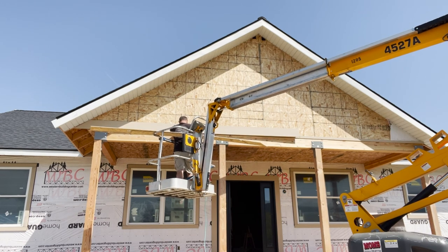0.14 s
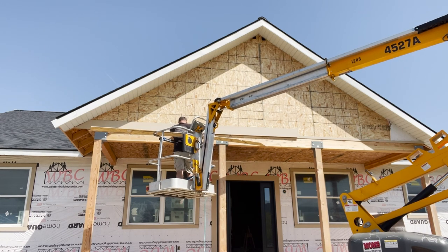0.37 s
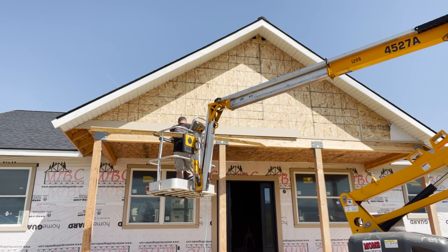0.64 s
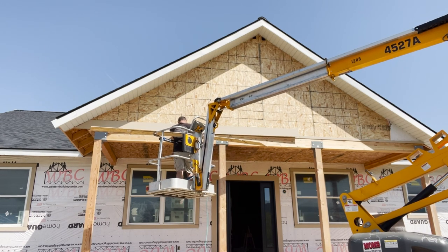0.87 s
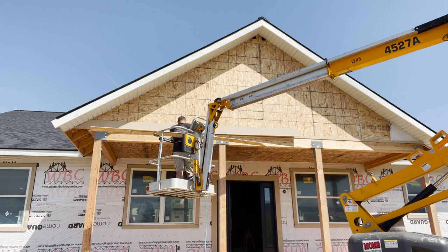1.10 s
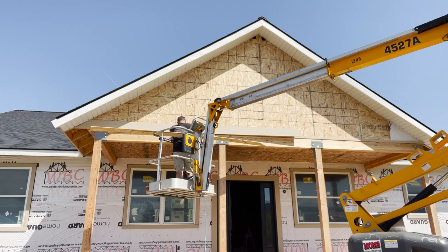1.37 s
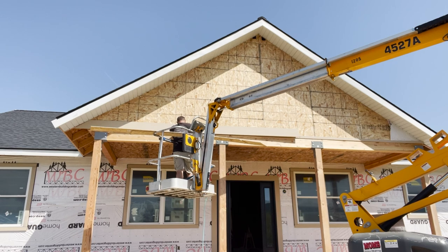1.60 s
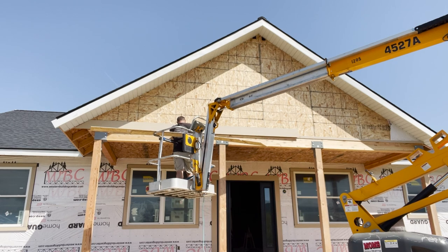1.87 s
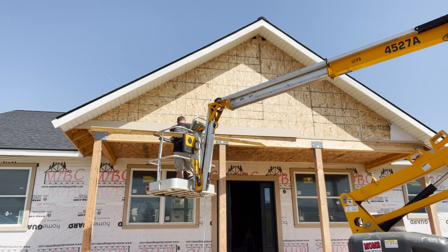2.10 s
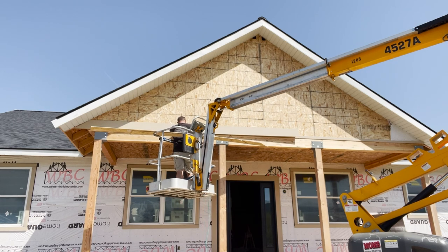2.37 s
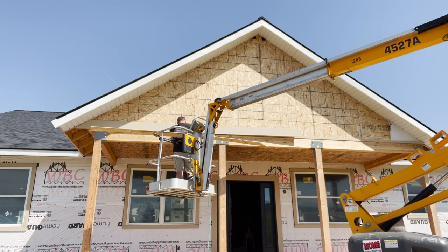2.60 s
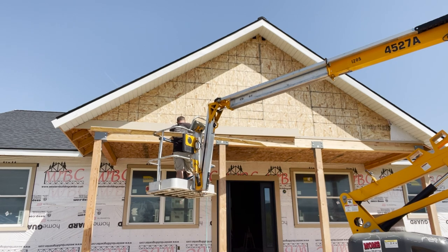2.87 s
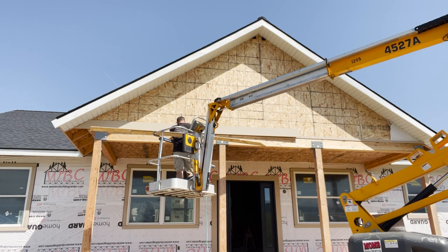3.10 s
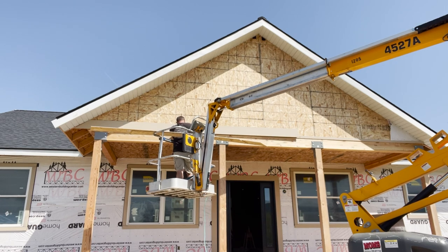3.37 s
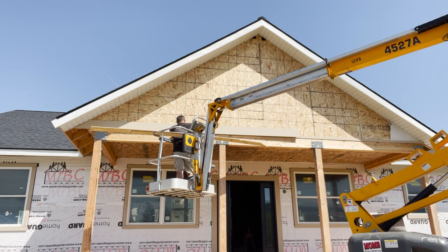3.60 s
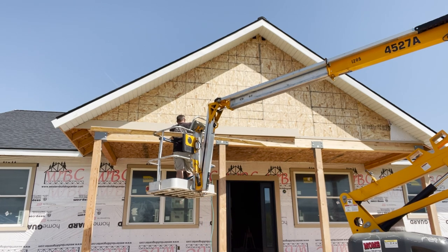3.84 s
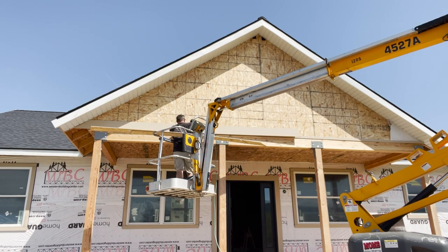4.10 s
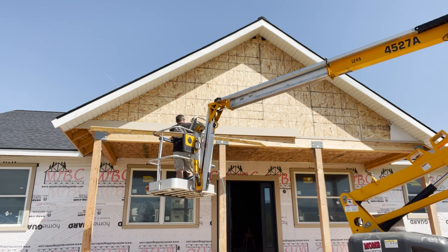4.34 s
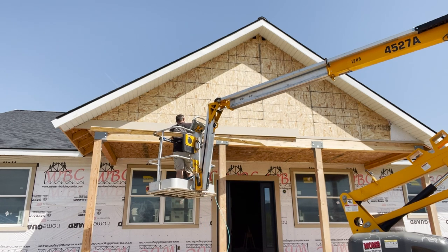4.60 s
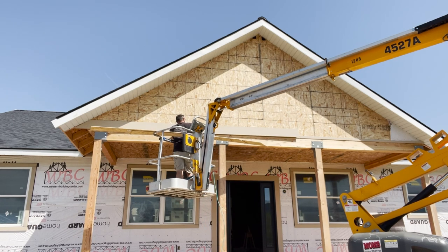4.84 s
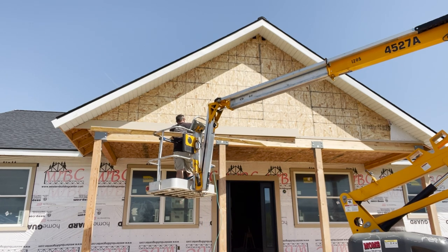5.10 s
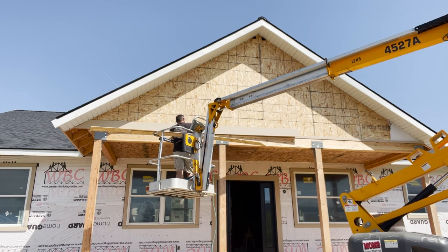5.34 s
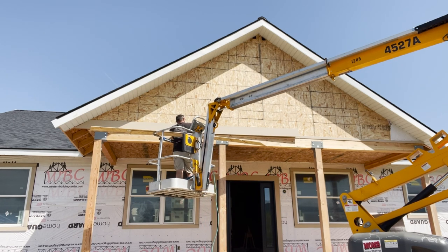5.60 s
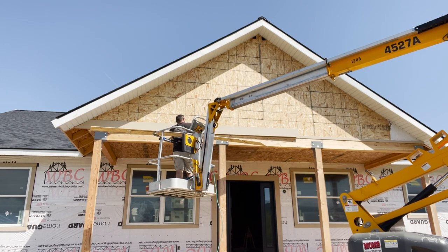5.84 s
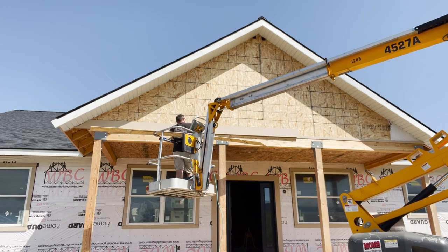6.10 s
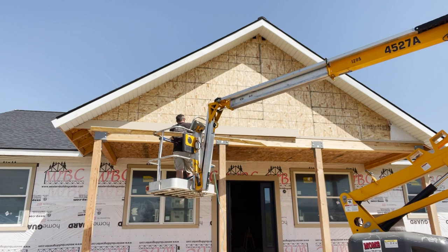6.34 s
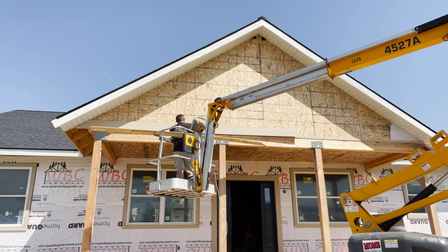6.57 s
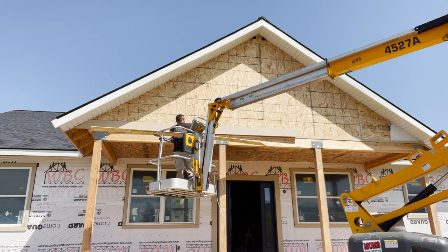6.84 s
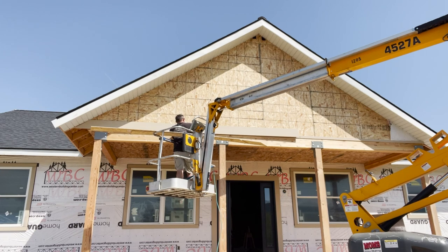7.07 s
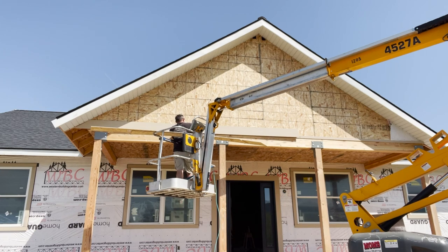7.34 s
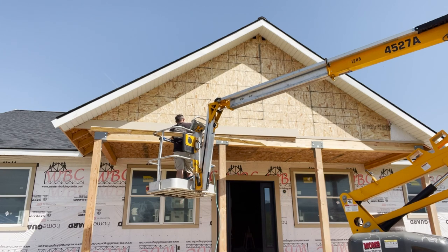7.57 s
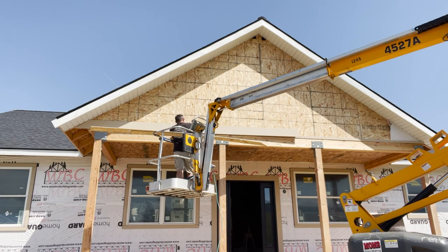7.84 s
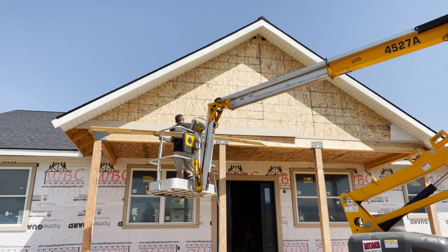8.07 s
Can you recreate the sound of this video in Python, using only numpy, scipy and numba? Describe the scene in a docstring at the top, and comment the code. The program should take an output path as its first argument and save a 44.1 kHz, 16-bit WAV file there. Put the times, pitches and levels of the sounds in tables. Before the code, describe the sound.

Throughout about 8 seconds, an engine drones to the right at roughly thirty firings a second, with a throbbing, rattling clatter and faint bright valve ticking. Wind thumps low on the stereo microphones, busiest in the first 1.7 seconds and again around 4, with scattered buffets later. A faint scrape comes at 0.5, then a tight group of woody knocks ahead at 1.5, with weaker taps at 1.7 and 2.0. From 3.15 to 3.5 a board bumps, scrapes and thuds, loudest near 3.36. Soft taps follow at 4.5 and 5.0. At 5.97 an air nailer fires once, a heavy, near-overloading crack, followed by two short gushes of hissing air, smaller thumps and metallic clicks until about 6.35. Porch posts scatter the blow immediately; the yard answers with a decaying tail and a faint late return. Engine and light wind continue to the end.

```python
"""A building site out of doors, ahead a timber porch: an engine drones to the right, gusts buffet two ports.
Engine: harmonics of the firing rate plus a throbbing noise clatter. Wind: swept noise in thumps and flaps.
A board is knocked into place: rough noise pushes ring its modes, slap and scrape.
Then an air nailer fires once: a heavy blow, bursts of hissing air, and small ringing metal ticks.
Posts, porch and yard return the work as early scatter and long decaying noise."""
import sys
import numpy as np
from scipy import signal
from scipy.fft import rfft, irfft, next_fast_len
from scipy.io import wavfile
from scipy.ndimage import uniform_filter1d, map_coordinates
from numba import njit

SR = 44100
rng = np.random.default_rng(int(sys.argv[2]) if len(sys.argv) > 2 else 0)


def voltage_ratio(decibels):
    """Convert decibels (scalar or array-like) to amplitude ratios, 20 dB per decade."""
    exponent = np.asarray(decibels, float) / 20
    return 10 ** exponent


def dump(signal):
    """Clip the signal to [-1, 1] and save it as 16-bit WAV at the path in sys.argv[1]."""
    limited = np.clip(np.atleast_2d(signal).T, -1, 1)
    pcm = np.round(limited * 32767).astype(np.int16)
    wavfile.write(sys.argv[1], SR, pcm)


N = 361617
T = np.arange(N) / SR
HZ = np.fft.rfftfreq(next_fast_len(N), 1 / SR)


def on_hz(table):
    """Spread a (pitch_hz, value) table over every bin, straight on a log axis."""
    hz, value = np.transpose(table)
    return np.interp(np.log(HZ + 1), np.log(hz + 1), value)


def ahead(table):
    """Phase turn of every bin from a (pitch_hz, phase_rad) table."""
    return np.exp(1j * np.interp(HZ, *np.transpose(table)))


def shape(x, gain):
    """Weight every frequency of x."""
    size = next_fast_len(N)
    return irfft(rfft(x, size) * gain, size)[..., :N]


def color_noise(x, table):
    """Give white noise the power per Hz of a (pitch_hz, level_db) table."""
    return shape(x, voltage_ratio(on_hz(table)) * np.sqrt(SR / 2))


def hiss(table):
    """Fresh noise coloured by a (pitch_hz, level_db) table."""
    return color_noise(rng.standard_normal(N), table)


def walk(rate_hz):
    """Random levels joined smoothly, so many a second; spread near 1."""
    step = int(SR / rate_hz)
    points = rng.standard_normal(N // step + 2)
    line = np.interp(np.arange(N) / step, np.arange(N // step + 2), points)
    return 1.22 * uniform_filter1d(line, step // 2 + 1)


def even(x, seconds):
    """Level out the swells of x over that span, rms near 1."""
    return x / np.sqrt(uniform_filter1d(x ** 2, int(seconds * SR)) + 0.23 * np.mean(x ** 2))


def decay(t, t60):
    """Exponential fall of 60 dB in t60, in the unit of t."""
    return np.exp(-np.log(1000) * t / t60)


def band(x, lo_hz, hi_hz, order=2):
    """Keep one band of x."""
    return signal.sosfilt(signal.butter(order, (lo_hz, hi_hz), "band", fs=SR, output="sos"), x)


def add(out, x, start_s):
    """Mix x into out from start_s."""
    i = int(start_s * SR)
    out[..., i:i + x.shape[-1]] += x[..., :N - i]


@njit
def svf(x, hz, damp):
    """State-variable low-pass with a moving edge."""
    y, mid, low = np.empty(len(x)), 0., 0.
    for i in range(len(x)):
        g = np.tan(np.pi * hz[i] / SR)
        v = (mid + g * (x[i] - low)) / (1 + g * (g + damp))
        y[i] = low + g * v
        mid, low = 2 * v - mid, 2 * y[i] - low
    return y


# exhaust note, before its waver: order [multiple of the firing rate], level_db [rms]
EXHAUST_ORDERS = [(2, -60), (3, -58), (4, -56.5), (5, -54), (6, -62.5), (7, -55.5), (8, -56), (9, -52.5),
                  (10, -57.5), (11, -62.5), (12, -61.5), (13, -62), (14, -64), (15, -55), (16, -59),
                  (17, -70.5), (18, -64), (19, -52.5), (20, -71), (21, -62.5), (22, -52.5), (23, -57),
                  (25, -66), (26, -69), (27, -54), (28, -61.5), (30, -75), (31, -55), (32, -66), (33, -79),
                  (34, -64), (35, -89), (36, -67), (37, -69), (38, -61), (39, -62), (40, -67), (41, -84),
                  (42, -58.5), (43, -57), (44, -83), (45, -65), (46, -63.5), (47, -62.5)]
# engine rattle and cooling air, before the beat; the last point is a steep
# treble cut-off, not the engine's own: pitch_hz, level_db [per Hz]
RATTLE_COLOR = [(60, -75), (250, -80.5), (700, -77.5), (1050, -82.5), (1280, -87), (1650, -87), (2170, -76),
                (2500, -87), (2750, -81.5), (3050, -85), (4100, -85), (4800, -85.5), (5400, -88.5),
                (7200, -93), (8000, -93.5), (15600, -105), (15900, -140)]
# engine at the left port against the right: pitch_hz, phase_rad [ahead]
LEFT_PORT_PHASE = [(0, 0), (250, -.9), (1300, -3.1), (1700, -3.4), (2000, -4.2), (3000, -6.3), (4400, -9.0),
                   (4950, -9.9), (6000, -12.6), (6900, -15.6), (7500, -15.7), (7700, -15.1), (11000, -13.2),
                   (11200, -12.57), (13700, -12.57), (15800, -9.7)]
# engine at the left port against the right: pitch_hz, level_db
LEFT_PORT_SHADE = [(60, 1.5), (110, -4.5), (200, 0.5), (380, -6.5), (700, -5.5), (1290, -5.5), (2380, -3),
                   (4400, 0), (8120, -4), (15000, 1.5)]
# the recorder turns a little in the hand, so the left port's lag drifts: time_s, extra_lag_ms
HAND_TURN = [(0, .001), (.6, -.002), (1.0, -.008), (1.5, 0), (2.25, -.014), (2.9, 0), (4.2, .004),
             (8.2, .002)]
# unrelated noise at each port, thinned in some bands and cut steeply near 15.8 kHz:
# pitch_hz, level_db [per Hz]
UNRELATED_NOISE = [(60, -94), (300, -83.5), (1500, -100), (2500, -106), (4700, -105), (5900, -100),
                   (7200, -112), (9500, -104), (11200, -125), (13600, -125), (15000, -108), (15600, -108),
                   (15900, -140)]


def engine(start=.4, smear=1.61, waver_db=1.56, throb=0.33, throb_at=0.38, second_throb=0.21, narrow=1.8,
           repeat=0.38, tick_db=-9.5, tick_scatter_db=6.0, tick_narrow=7.5):
    """One firing a cycle: loosely phased orders make a soft pulse; valves shake the rattle twice a cycle."""
    firing_hz, hunt_share, tremble_ms = 29.91, .002, .003
    # the governor hunts around the firing rate
    cycles = start + np.cumsum(firing_hz * (1 + hunt_share * walk(4))) / SR
    turn = 2 * np.pi * cycles
    note = np.zeros(N)
    for order, db in EXHAUST_ORDERS:
        level = voltage_ratio(db + waver_db * walk(9)) * np.sqrt(2)
        phase = smear * min(order / 14, 1.3) * rng.standard_normal()
        note -= level * np.cos(order * turn + phase)

    valve = np.cos(turn - 2 * np.pi * throb_at)
    beat = 0.8 + throb * np.exp(narrow * (valve - 1)) + second_throb * np.exp(-narrow * (valve + 1))
    # part of the clatter is the same on every cycle, the rest is fresh
    size = SR // 30
    same = rng.standard_normal(size)[(cycles % 1 * size).astype(int)]
    clatter = np.sqrt(repeat) * same + np.sqrt(1 - repeat) * rng.standard_normal(N)
    right = note + beat * voltage_ratio(0.09 * walk(3.24)) * color_noise(clatter, RATTLE_COLOR)

    # a valve ticks in the highest treble, harder on some cycles than on others
    tick_levels = voltage_ratio(tick_db + tick_scatter_db * rng.standard_normal(int(cycles[-1]) + 1))
    tick = tick_levels[cycles.astype(int)] * np.exp(tick_narrow * (valve - 1))
    right = right + tick * shape(right, HZ > 7600)

    # the left port lies further off and in the shade of the recorder's body
    left = shape(right, voltage_ratio(on_hz(LEFT_PORT_SHADE)) * ahead(LEFT_PORT_PHASE))
    # the drift and tremble in lag act below 6.2 kHz only
    lagging = shape(left, HZ < 6200)
    lag_ms = np.interp(T, *np.transpose(HAND_TURN)) + tremble_ms * walk(6)
    delayed = map_coordinates(lagging, [(T - lag_ms / 1000) * SR], order=3, mode="nearest")
    left = left - lagging + delayed
    return np.array([left + hiss(UNRELATED_NOISE), right + hiss(UNRELATED_NOISE)])


# breeze between the buffets: time_s, level_db
BREEZE_LEVEL = [(0, -35), (.6, -41.5), (1.3, -41), (1.8, -39), (2.05, -49.5), (2.7, -51.5), (3.1, -60),
                (3.7, -48.5), (3.95, -38.5), (4.4, -36), (4.6, -43.5), (5.3, -61), (5.9, -46), (6.5, -44),
                (6.9, -44.5), (7.5, -42), (8.2, -42)]
# buffets: top_s, level_db, width_s [top to 1/e], flap_db [flap drive against thump drive]
GUST_BUFFETS = [(0.03, -28, 0.074, -18), (.25, -41, 0.078, -13), (.34, -38, 0.023, -22),
                (.43, -28.5, 0.015, -25), (.58, -40.5, 0.037, 3.5), (.67, -35, 0.021, -8),
                (.83, -37.5, 0.14, -5), (1.07, -32, 0.031, 0), (1.2, -39, 0.041, -6),
                (1.29, -37, 0.041, -1), (1.47, -34.5, 0.014, -19), (1.72, -42, 0.062, -3.5),
                (2.89, -41, 0.055, -10), (3.78, -40.5, 0.055, -5.5), (4.06, -32, 0.058, -5.5),
                (4.15, -27, .04, -28), (4.3, -35, 0.086, -29), (4.65, -44, 0.024, -4),
                (4.77, -41, 0.043, -4), (4.87, -48, 0.027, -17), (5.37, -44, .04, 1),
                (5.501, -30.5, 0.04, -19), (5.66, -46, .04, -3), (5.83, -41.5, 0.02, -24),
                (6.51, -38, 0.019, -9), (6.87, -42, 0.022, -15), (7.41, -46, 0.044, -16),
                (7.6, -34, 0.021, -22), (7.73, -39, 0.031, -19), (8.03, -45, .04, -25),
                (8.2, -40, 0.04, -15)]


def wind(eddy_db=1.56, thump_hz=74, flap_hz=150, swing=0.27, alike=0.61):
    """Eddies, partly shared by the ports: low thumps of wandering pitch, a quicker flap above them."""
    breeze_flap_db, left_db, sway_db = -10.5, -1.5, 2
    breeze = voltage_ratio(np.interp(T, *np.transpose(BREEZE_LEVEL)))
    push, flutter = breeze, voltage_ratio(breeze_flap_db) * breeze
    for top_s, db, width_s, flap_db in GUST_BUFFETS:
        hump = voltage_ratio(db) * np.exp(-((T - top_s) / width_s) ** 2)
        push = push + hump
        flutter = flutter + voltage_ratio(flap_db) * hump

    pan_db = left_db + sway_db * walk(12)
    shared, ports = rng.standard_normal(N), []
    for side in (.5, -.5):
        eddies = np.sqrt(alike) * shared + np.sqrt(1 - alike) * rng.standard_normal(N)
        thump = svf(eddies, thump_hz * np.exp(swing * walk(16)), .6)
        thump = band(thump, 0.55 * thump_hz, 2.54 * thump_hz)
        flap = svf(eddies, flap_hz * np.exp(swing * walk(16)), 1.2)
        flap = band(flap, 0.53 * flap_hz, 2.24 * flap_hz)
        # the gust, not the eddies' chance, sets the level
        gust = push * even(thump, 0.065) + flutter * voltage_ratio(1.5 * eddy_db * walk(40)) * even(flap, 0.044)
        ports.append(gust * voltage_ratio(side * pan_db + eddy_db * walk(24)))
    return np.array(ports)


# contacts on timber: start_s, level_db [peak of ring and slap, before the low cut],
# fall_ms [t60], color_hz [centre], scrape_db [bright scrape against the body]
TIMBER_KNOCKS = [(0.466, -55, 230, 4500, 10), (1.478, -24, 180, 1390, -24), (1.494, -25.5, 84, 930, -17),
                 (1.517, -27.5, 90, 990, -13), (1.724, -41, 160, 1250, -37), (2.035, -41, 81, 1030, -16),
                 (3.147, -36, 100, 890, -24), (3.162, -34, 180, 1200, -10), (3.222, -27.5, 180, 1340, -8),
                 (3.243, -27, 130, 1100, -5.5), (3.344, -27.5, 130, 1440, -16),
                 (3.352, -20.5, 92, 600, -38), (3.365, -20.5, 86, 560, -40), (3.39, -29, 330, 794, -13),
                 (3.47, -39, 110, 1000, -18), (3.52, -37.5, 74, 1100, -13), (4.474, -40, 110, 1000, -13),
                 (4.96, -40, 80, 501, -5), (5.9595, -11.5, 34, 590, -11), (5.97, -0.5, 108, 1500, -24),
                 (5.976, -1.5, 90, 434, -36), (6.043, -13.5, 200, 950, -15.5), (6.14, -24, 57, 470, -37.5),
                 (6.248, -33, 60, 2100, -23), (6.31, -33.5, 74, 920, -20)]
# modes of the board: pitch_hz, level_db [relative], t60_s
BOARD_MODES = [(176, 15, 0.21), (245.5, 12.5, 0.16), (290, 3.5, 0.074), (517, -2, 0.055), (560, 7, 0.025),
               (681, 3, 0.046), (875, -2, 0.04), (953, 1, 0.03), (1110, -15, 0.023), (1224, -3, 0.03),
               (1350, -2.5, 0.024), (1520, 2, 0.025), (1880, -14, 0.056), (2240, -5, 0.057),
               (2600, -19, 0.016), (2940, 10.5, 0.0076)]


def knocks(octaves=0.93, scatter_db=0.5, slap_db=-4.5, scrape_hz=(1800, 7000)):
    """A rough push rings the board's modes near its colour, slaps around it and scrapes in the treble."""
    out, t = np.zeros(N), T[:SR // 3]
    t_ms = t * 1000
    for start_s, db, fall_ms, color_hz, scrape_db in TIMBER_KNOCKS:
        # the louder the knock, the longer its push takes to build
        rise_ms = max(1.95 + 0.07 * db, .5)
        swell = np.minimum(t_ms / rise_ms, 1) * decay(np.maximum(t_ms - rise_ms, 0), fall_ms)
        push, rub = swell * rng.standard_normal((2, len(t)))
        ring = np.zeros(len(t))
        for mode_hz, mode_db, t60_s in BOARD_MODES:
            level_chance, pitch_chance = rng.standard_normal(2)
            off_color = np.log2(mode_hz / color_hz) / octaves
            level = voltage_ratio(mode_db - 11.5 * off_color ** 2 + scatter_db * level_chance)
            tone = np.sin(2 * np.pi * mode_hz * (1 + 0.028 * pitch_chance) * t)
            ring += level * decay(t, t60_s) * tone
        ring = signal.fftconvolve(push, ring)[:len(t)]
        slap = band(rub, 0.6 * color_hz, 2.42 * color_hz)
        body = ring / ring.std() + voltage_ratio(slap_db) * slap / slap.std()
        scrape = voltage_ratio(scrape_db) * band(rub, *scrape_hz, order=1)
        add(out, voltage_ratio(db) * (body / np.abs(body).max() + scrape), start_s)
    # low cut: removes the boom that the sine-started modes leave in the bass
    return signal.sosfilt(signal.butter(2, 102, "high", fs=SR, output="sos"), out)


def posts(x):
    """First returns from posts and soffit: a short midrange scatter, unlike left and right."""
    level_db, t60_s, bounce_hz = -6.5, 0.033, (685, 3570)
    t = T[:SR // 20]
    scatter = rng.standard_normal((2, len(t))) * decay(t, t60_s)
    scatter = scatter / np.sqrt(np.sum(scatter ** 2, axis=1, keepdims=True))
    near = band(x, *bounce_hz)
    return voltage_ratio(level_db) * signal.fftconvolve(near[None], scatter, axes=1)[:, :N]


# answer of porch and yard by band: from_hz, to_hz, t60_s, level_db [relative], alike [0-1, at the ports]
YARD_BANDS = [(111, 316, 0.76, -13, 0.97), (338, 1020, 0.55, -19, 0.6), (1200, 4350, 1.06, -21, 0.4),
              (3600, 17000, 0.47, -22, .3)]


def walls(x, build_s=0.0095):
    """Countless reflections: noise decaying at its own rate in each band, with a late swell from a far wall."""
    far_wall_s, far_wall_db = 0.278, -12.5
    t = T[:SR]
    late = np.maximum(t - far_wall_s, 0)
    answer = 0
    for lo_hz, hi_hz, t60_s, db, alike in YARD_BANDS:
        alike = np.clip(alike, 0, 1)
        noise = rng.standard_normal((3, len(t)))
        noise = band(np.sqrt(alike) * noise[0] + np.sqrt(1 - alike) * noise[1:], lo_hz, hi_hz)
        near_fade = (1 - np.exp(-t / build_s)) * decay(t, t60_s)
        far_fade = voltage_ratio(far_wall_db) * (1 - np.exp(-late / build_s)) * decay(late, t60_s)
        answer = answer + voltage_ratio(db) * noise * (near_fade + far_fade) / np.sqrt(SR * build_s)
    return signal.fftconvolve(x[None], answer, axes=1)[:, :N]


def puff(start_s, open_s, level_db, rise_ms):
    """The valve opens, pressure sags, the valve snaps shut and the rest leaks away."""
    sag_db_per_s, shut_s, leak_db, leak_t60_s = 107, 0.0012, 16.5, 0.12
    since_open = np.clip(T - start_s, 0, open_s)
    since_shut = np.maximum(T - start_s - open_s, 0)
    # the leak is larger after a longer puff
    leak = voltage_ratio(leak_db) * open_s * decay(since_shut, leak_t60_s)
    after = np.maximum(np.exp(-since_shut / shut_s), leak)
    rise = np.minimum(since_open * 1000 / rise_ms, 1) ** 2
    return voltage_ratio(level_db - sag_db_per_s * since_open) * rise * after


# colour of the air jet: pitch_hz, level_db [relative]
JET_COLOR = [(1500, -16), (4000, -5.5), (6500, 3), (7600, 1.5), (11000, 1), (14000, 0.5), (16000, -28)]
# jet at the left port against the right: pitch_hz, phase_rad [ahead]
JET_PORT_PHASE = [(0, 0), (4600, 0), (5600, -1.9), (7800, -2.6), (10000, -.8), (11200, -.1), (16400, 0)]
# air leaving the nailer: start_s [valve opens], open_s, level_db [rms before rise and sag], rise_ms
AIR_PUFFS = [(5.961, .004, -30, 2.2), (5.9708, 0.0024, -14, 0.88), (5.977, .065, -19.5, 22),
             (6.086, 0.058, -20.5, 11)]


def nailer_air(alike=0.84):
    """Escaping air hisses as coloured noise, partly unrelated at the two ports, gated by the valve."""
    jet = [hiss(JET_COLOR) for _ in range(3)]
    gain = sum(puff(*row) for row in AIR_PUFFS) / jet[0].std()
    common = np.array([shape(jet[0], ahead(JET_PORT_PHASE)), jet[0]])
    return gain * (np.sqrt(alike) * common + np.sqrt(1 - alike) * np.array(jet[1:]))


# small metal ticks of the nailer's valve: peak_s, level_db [nominal peak], pitch_hz [middle ring]
VALVE_TICKS = [(6.0805, -24, 4740), (6.252, -22, 4600), (6.3305, -28, 4250)]


def ticks(rise_s=0.0011, body_db=-7, spread=0.1, rasp=0.29):
    """A small steel part clicks: three close rings over a duller tap in the housing, an octave down."""
    out, t = np.zeros(N), T[:SR // 20]
    for peak_s, db, hz in VALVE_TICKS:
        ring = sum(np.sin(2 * np.pi * hz * (1 + spread * k) * t) for k in (-1, 0, 1)) / 2
        ring = ring + voltage_ratio(body_db) * np.sin(np.pi * hz * t)
        ring = ring + rasp * uniform_filter1d(rng.standard_normal(len(t)), size=3)
        swell = np.minimum(t / rise_s, 1) * decay(t, .011)
        add(out, voltage_ratio(db) * swell * ring, peak_s - rise_s)
    return out


def scene():
    """The work is straight ahead, a shade to the right; posts, porch and yard send it back."""
    drone, gusts = engine(), wind()
    work, jet = knocks() + ticks(), nailer_air()
    # the left port hears the work one sample later
    direct = np.array([voltage_ratio(-1.0) * np.roll(work, 1), voltage_ratio(0.4) * work])
    return direct + posts(work) + jet + walls(work + 0.37 * jet[0]) + drone + gusts


def roll_off(x):
    """The treble ends steeply here."""
    return signal.sosfilt(signal.butter(12, 16830, fs=SR, output="sos"), x)


def record(dry):
    """The microphones lose the deepest bass; peaks past full scale are clipped."""
    heard = signal.sosfilt(signal.butter(3, 42, "high", fs=SR, output="sos"), dry)
    return roll_off(np.clip(heard, -1, 1))


dry = scene()
out = record(dry)
dump(out)
```